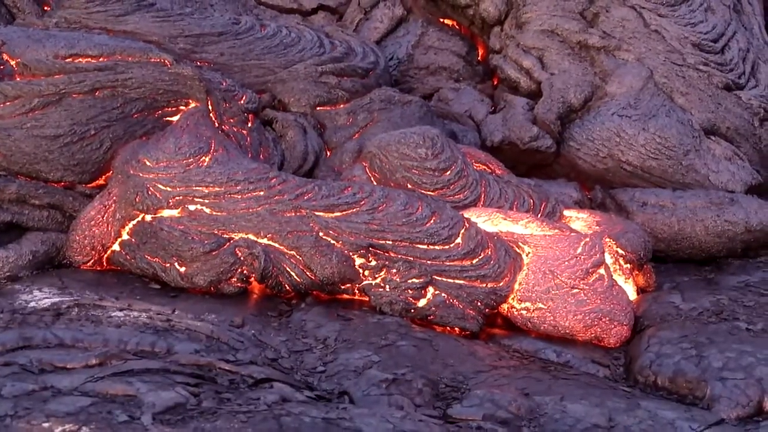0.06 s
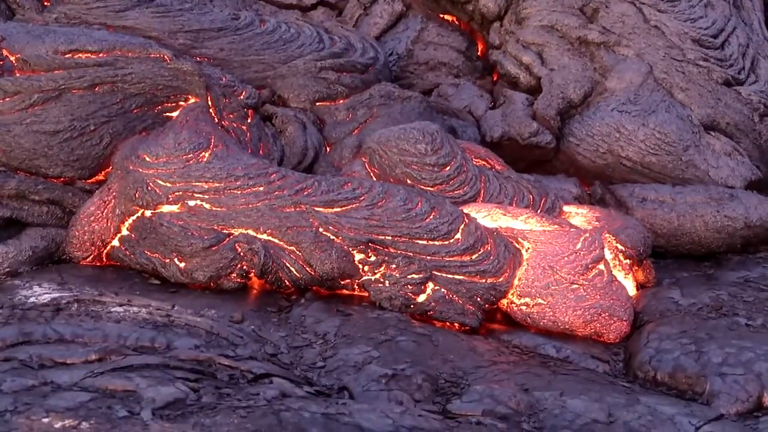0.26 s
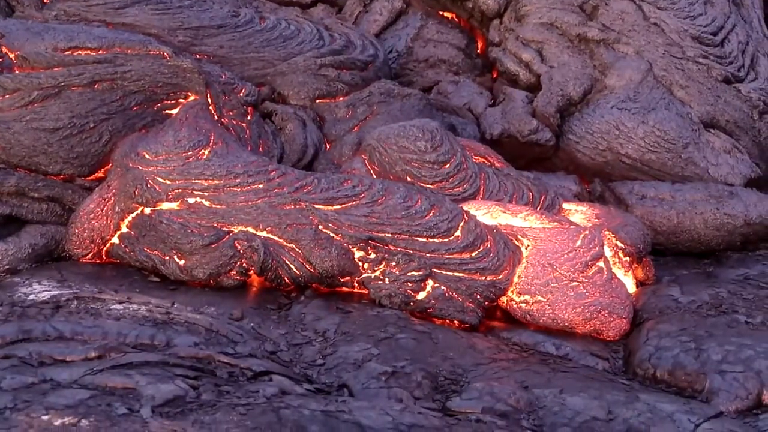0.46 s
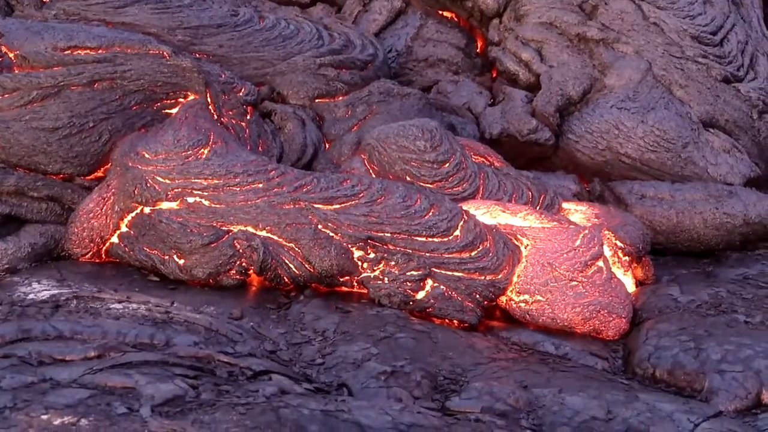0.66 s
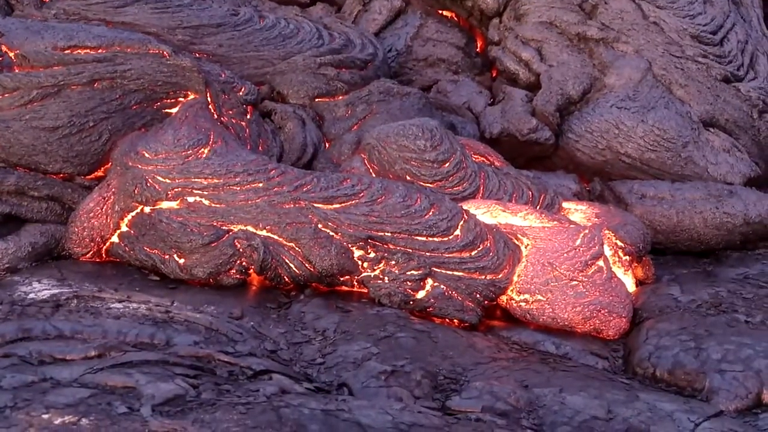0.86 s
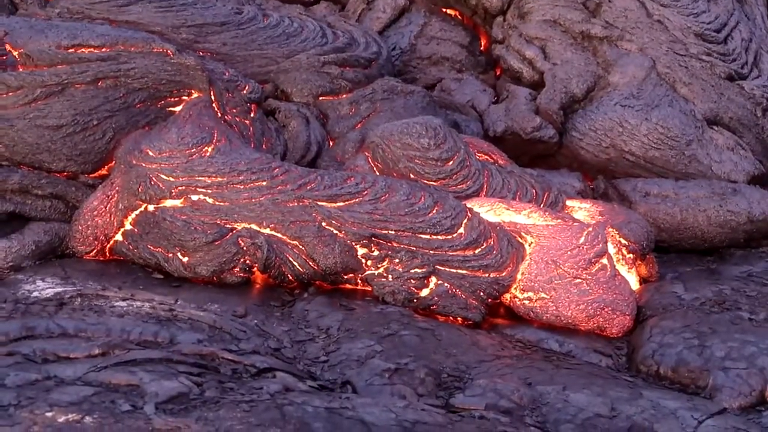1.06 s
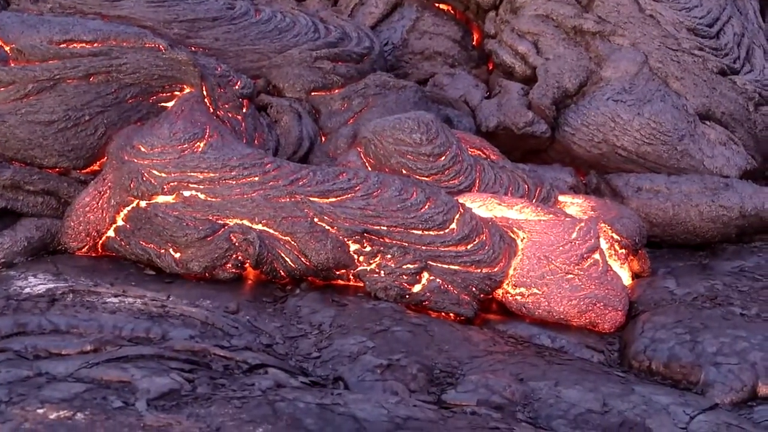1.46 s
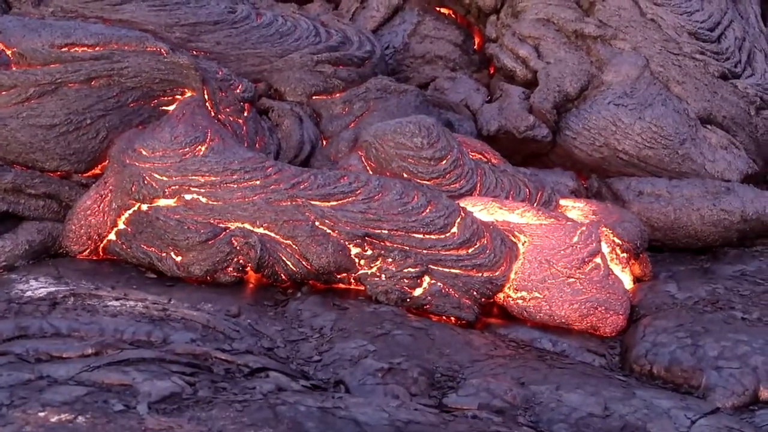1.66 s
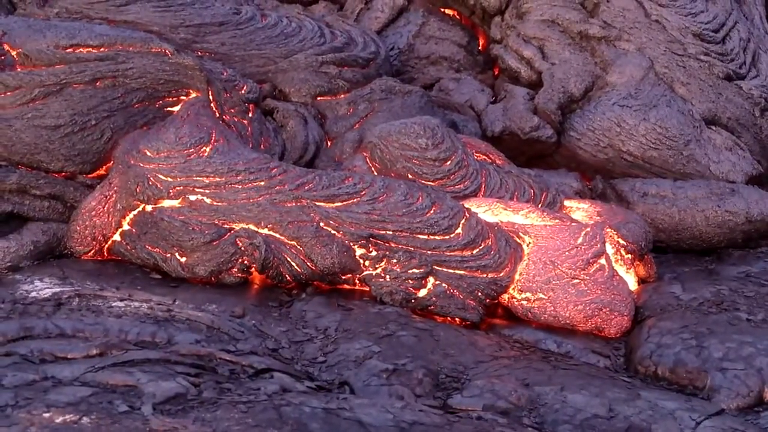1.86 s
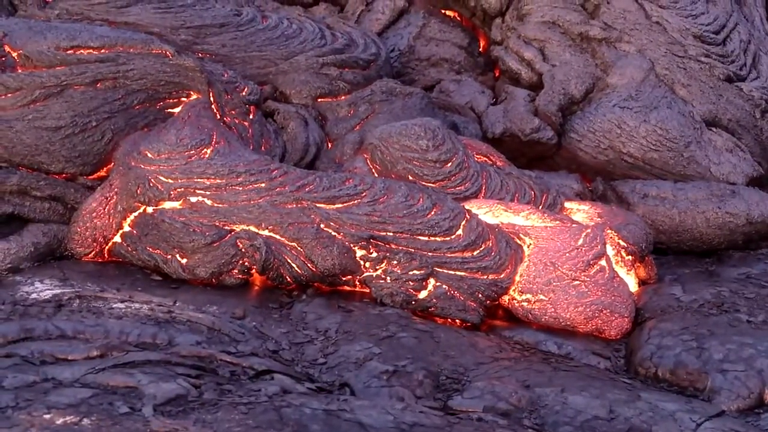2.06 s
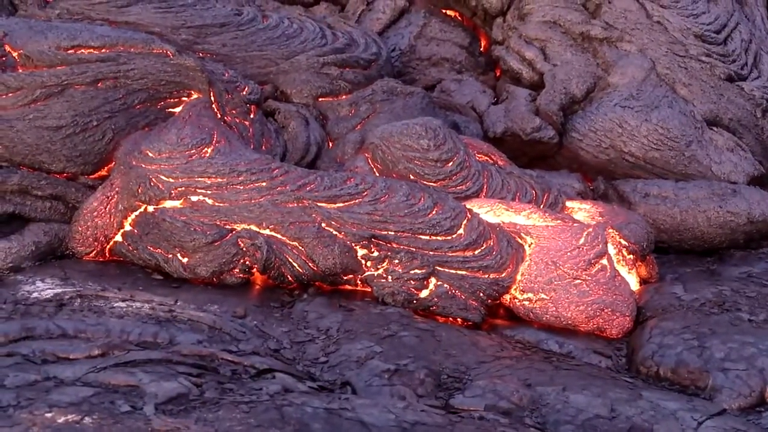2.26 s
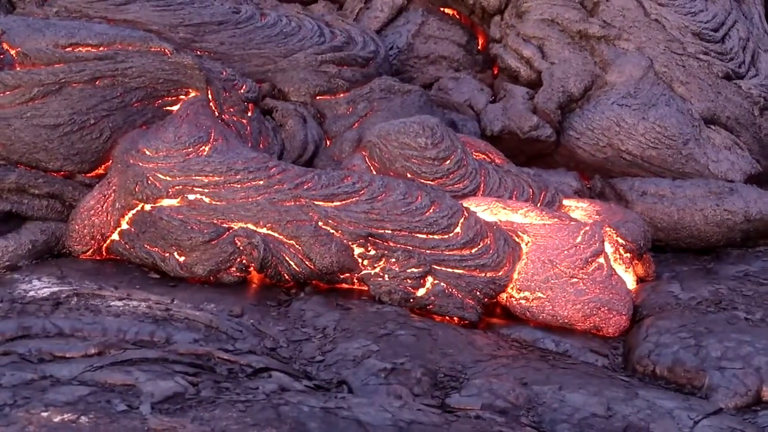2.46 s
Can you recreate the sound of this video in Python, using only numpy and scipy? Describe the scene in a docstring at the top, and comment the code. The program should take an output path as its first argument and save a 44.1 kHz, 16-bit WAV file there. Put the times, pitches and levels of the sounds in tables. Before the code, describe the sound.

Cooling lava crust gives one sharp, dry crack, followed by a few short, dull crunches and scattered small ticks. Outdoors, a faint hiss and fine crackle continue while wind gusts rumble and thump on the microphone.

```python
"""A lava flow cools in the open. From the start there is a faint hiss and a fine crackle of tiny snaps,
while gusts rumble on the microphone, more on the right. At 0.4 s the crust breaks with one sharp crack.
From about 0.6 to 0.9 s come short, dull, gritty crunches, probably the camera being handled, and the
microphone's housing rings thin and high. Small ticks of the crust come and go from then on. Around 2 s
the wind swells again, and its strongest eddies (small swirls of air) thump."""
import sys
import numpy as np
from scipy import signal
from scipy.fft import rfft, irfft
from scipy.io import wavfile
from scipy.ndimage import uniform_filter1d

SR = 44100
rng = np.random.default_rng(int(sys.argv[2]) if len(sys.argv) > 2 else 0)


def output_pcm(signal):
    """Save a mono or channel-first signal as 16-bit PCM at the path in sys.argv[1].

    Samples are clipped to [-1, 1] before scaling.
    """
    pcm = np.clip(np.atleast_2d(signal).T, -1, 1) * 32767
    wavfile.write(sys.argv[1], SR, np.round(pcm).astype(np.int16))


N = 110250  # 2.5 s

# the crack and its echo off the ground (time [s], level [dB])
CRACK_AND_ECHO = [(0.4005, -9), (.4106, -32)]
# the notes the slab rings with (pitch [Hz], level [dB], time to fade by 60 dB [s])
SLAB_NOTES = [(966, -6.5, 0.011), (1383, -12.5, 0.025), (1930, -4.5, 0.011), (2300, -8, 0.021),
              (2520, -5, 0.0052), (3110, -14, .021), (4700, -29.5, 0.045), (5060, -31, 0.049),
              (6060, -35, .025), (7110, -28, .015), (8273, -34.5, 0.015), (9680, -21, 0.015),
              (13400, -25, .011)]
# tone of the breaking noise (frequency [Hz], level [dB])
BREAK_TONE = [(200, 6), (850, 4), (2300, -9), (3100, -4), (3700, -11), (5000, -9.5), (6500, -13),
              (8500, -6.5), (11800, -6), (13300, -12), (15500, -33)]
# small ticks of the crust (time [s], level [dB], pitch [Hz], fade time [s])
CRUST_TICKS = [(0.6841, -27, 1180, 0.0011), (0.7021, -26, 2080, 0.0024), (0.8251, -33, 2070, 0.003),
               (0.8678, -33, 2320, 0.0027), (1.4094, -32.5, 1470, 0.0028), (1.4415, -37, 1320, 0.0041),
               (1.5505, -27, 2470, 0.0017), (1.774, -30, 1550, 0.0011), (1.7979, -30.5, 3030, 0.0015),
               (1.8123, -32, 2380, .002), (1.827, -35, 2430, 0.0023), (1.8338, -23.5, 1360, 0.0022),
               (1.85, -24, 1380, 0.0017), (1.879, -33, 1450, 0.0022), (2.0275, -34.5, 2810, 0.0019),
               (2.1055, -33.5, 1440, 0.0023), (2.2155, -33.5, 2390, 0.0018), (2.3157, -24, 1900, 0.00075),
               (2.3326, -26, 2420, 0.0013), (2.353, -20.5, 1890, 0.0013), (2.369, -31, 1740, 0.0056),
               (2.38, -29, 1780, 0.0041), (2.3963, -34, 1810, 0.0034), (2.413, -34, 2770, 0.0028),
               (2.459, -23.5, 1740, 0.0019)]
# tone of the puff of noise in a tick (frequency [Hz], level [dB])
PUFF_TONE = [(150, -31), (500, -2.5), (1000, -4), (3400, -3.5), (4600, -20.5), (8000, -18), (13000, -27),
             (15500, -42)]
# short, dull crunches (time [s], level [dB])
CRUNCHES = [(0.642, -34.5), (0.669, -31), (.683, -29), (0.7005, -22), (0.721, -23.5), (0.822, -33),
            (0.845, -39), (0.861, -34)]
# tone of a crunch (frequency [Hz], level [dB])
CRUNCH_TONE = [(100, 1), (300, 2), (550, 2.5), (800, -12.5), (1500, -21), (2400, -20), (4000, -30.5),
               (6000, -34), (7500, -30), (9000, -27), (11000, -17), (15000, -47)]
# swarms of fine crackle (time [s], level [dB])
CRACKLE_LEVEL = [(0, -59.5), (.6, -59), (.69, -51.5), (.76, -48.5), (.8, -60), (.85, -48.5), (.89, -54.5),
                 (1.3, -56), (1.42, -52), (1.74, -59.5), (1.85, -52), (1.92, -58), (2.28, -58), (2.37, -51),
                 (2.5, -55)]
# tone of its tiny snaps (frequency [Hz], level [dB])
SNAP_TONE = [(150, 0), (900, 0), (2800, -2.5), (3500, -11), (5000, -12), (9000, -20.5), (15000, -46)]
# bright grit around the crunches (time [s], level [dB])
GRIT_LEVEL = [(.6, -67), (.65, -64), (.71, -57), (.77, -80), (.8, -73), (.845, -51), (.9, -87)]
# tone of its grains (frequency [Hz], level [dB])
GRAIN_TONE = [(1000, 5), (3500, 4), (6000, -2), (7500, 7), (10000, -8), (13000, -17), (15500, -23)]

# gusts at the microphone (time [s], level [dB])
GUST_LEVEL = [(0, -67), (.07, -36), (.17, -42), (.225, -38.5), (.335, -59), (.385, -24.5), (.48, -37.5),
              (.53, -26), (.58, -57), (.65, -37.5), (.72, -23), (.81, -31), (.88, -44), (.98, -58),
              (1.015, -38.5), (1.12, -41.5), (1.2, -56.5), (1.33, -51.5), (1.4, -38.5), (1.52, -64.5),
              (1.61, -37), (1.68, -66), (1.8, -43), (1.86, -25.5), (1.935, -25.5), (1.97, -33), (2.0, -31),
              (2.035, -31), (2.05, -34.5), (2.075, -16.5), (2.105, -34.5), (2.13, -29), (2.155, -52),
              (2.19, -37.5), (2.245, -30), (2.285, -53), (2.5, -76)]
# tone of their low rumble (frequency [Hz], level [dB])
GUST_RUMBLE_TONE = [(20, -25), (45, -9), (70, 2), (95, 8.5), (135, 1), (190, -7.5), (280, -15.5),
                    (500, -66), (900, -90)]
# tone of their higher flutter (frequency [Hz], level [dB])
GUST_FLUTTER_TONE = [(60, -47), (130, -3), (190, 1.5), (300, -7), (430, -5.5), (540, -24), (800, -43),
                     (1500, -106)]
# the wind's deepest rumble (time [s], level [dB])
DEEP_LEVEL = [(0, -51), (.07, -42), (.23, -42.5), (.32, -42), (.38, -37.5), (.53, -42.5), (.62, -44.5),
              (.95, -41.5), (1.02, -37.5), (1.22, -54), (1.42, -48.5), (1.75, -58.5), (1.87, -36),
              (2.06, -40), (2.22, -36.5), (2.32, -67), (2.39, -51), (2.5, -69)]
# tone of that deepest rumble (frequency [Hz], level [dB])
DEEP_RUMBLE_TONE = [(5, -33), (20, -5.5), (40, -6), (62, 1.5), (90, -4), (160, -23), (400, -98)]
# eddies that suck at the microphone (time [s], peak level [dB], pitch [Hz], half-width [cycles])
EDDY_THUMPS = [(0.2286, -24.5, 117, .5), (0.369, -22.5, 194, 0.58), (.386, -19, 157, 0.66),
               (.438, -15.5, 144, 0.61), (0.4937, -25, 214, 0.47), (0.525, -13, 200, 0.36),
               (0.704, -18, 314, 0.55), (0.7207, -9.5, 302, 0.56), (0.744, -22, 198, 0.81),
               (0.771, -19.5, 211, 0.85), (1.127, -25.5, 184, 0.75), (1.8619, -17, 207, 0.56),
               (1.882, -17.5, 127, 0.67), (1.9047, -15, 170, 0.54), (1.9275, -16, 145, 0.56),
               (1.9527, -15.5, 251, 0.88), (1.9839, -23, 182, 0.85), (2.0633, -13.5, 134, 0.34),
               (2.0763, -14.5, 223, 0.64), (2.087, -14, 180, 1), (2.1346, -22.5, 141, 0.34),
               (2.176, -22, 175, 0.58), (2.2454, -20, 127, 0.37)]
# how the wind leans to the right (frequency [Hz], left minus right [dB])
WIND_BALANCE = [(30, -1.5), (80, -0.5), (150, -3), (260, -7.5), (420, -12), (800, -22)]
# thin ring of the microphone's housing (time [s], level [dB])
RING_LEVEL = [(.6, -90), (.63, -79), (.648, -57), (.69, -56), (.705, -47), (.73, -48), (.77, -56),
              (.795, -71), (.815, -66), (.83, -55), (.85, -52), (.87, -64), (.9, -90)]
# tone of the steady hiss (frequency [Hz], level [dB])
HISS_TONE = [(150, -5), (400, 7), (520, -2.5), (750, 5), (1100, -6), (1400, 2), (1720, -7), (1980, -2.5),
             (2230, -8), (2450, 2), (2750, -8), (3050, -4), (4000, -7.5), (5000, -12.5), (7000, -16.5),
             (10000, -19), (13000, -19.5), (14500, -26), (15500, -47)]
# how alike the hiss is on the left and right (frequency [Hz], likeness [-1 to 1])
HISS_LIKENESS = [(300, 0.87), (700, 0.61), (1400, 0.2), (3000, 0.65), (4500, 0.051), (6500, 0.096),
                 (10000, 0.32), (14000, -0.67)]


def crack():
    """The crust breaks: a burst of noise, a short ring of the slab, and a brief, faint, noisy tail."""
    hold_s, fall_s, tail_s = .0025, .0007, .009
    burst_db, tail_db = -15, -23
    out, t = np.zeros(N), np.arange(4096) / SR
    rise = np.minimum(t / .0003, 1)
    burst = amp(burst_db) * np.exp(-np.maximum(t - hold_s, 0) / fall_s)
    slab = sum((-1) ** k * amp(db - 60 * t / fade_s) * np.sin(2 * np.pi * hz * t)
               for k, (hz, db, fade_s) in enumerate(SLAB_NOTES))
    for s, db in CRACK_AND_ECHO:
        add(out, s, amp(db) * rise * (burst * noise(BREAK_TONE, len(t)) + slab))
    s, db = CRACK_AND_ECHO[0]
    tail = rise * np.exp(-t / tail_s) * noise(BREAK_TONE, len(t))
    add(out, s, amp(db + tail_db) * tail)
    return out


def ticks(rise_s=.00037, note_db=-5, puff_db=-9.5):
    """Each tick of the crust is a puff of noise and a note that dies almost at once."""
    out, t = np.zeros(N), np.arange(1024) / SR
    for s, db, hz, fall_s in CRUST_TICKS:
        note = amp(note_db) * np.sin(2 * np.pi * hz * t)
        puff = amp(puff_db) * noise(PUFF_TONE, len(t))
        shape = np.minimum(t / rise_s, 1) * np.exp(-t / fall_s)
        add(out, s, amp(db) * shape * (note + puff))
    return out


def crunches(rise_s=.002, fall_s=.0053):
    """Short, dull, gritty crunches, probably the camera being handled."""
    out, t = np.zeros(N), np.arange(2048) / SR
    shape = np.minimum(t / rise_s, 1) * np.exp(-t / fall_s)
    for s, db in CRUNCHES:
        add(out, s, amp(db + 1) * shape * noise(CRUNCH_TONE, len(t)))
    return out


def crackle():
    """Tiny snaps come in swarms as the lava's skin stretches; brighter grit goes with the crunches."""
    skin = level(CRACKLE_LEVEL) * snaps(SNAP_TONE, per_s=760)
    grit = level(GRIT_LEVEL) * snaps(GRAIN_TONE, per_s=4700)
    return skin + grit


def wind(rumble_db=-.5, flutter_db=-35.5, strong_gust_db=-25):
    """Gusts push and eddies suck at both sides of the microphone, harder on the right."""
    gust, t = level(GUST_LEVEL), np.arange(N) / SR
    rumble = amp(rumble_db) * gust * turbulence(GUST_RUMBLE_TONE)
    deep = level(DEEP_LEVEL) * turbulence(DEEP_RUMBLE_TONE)
    growth = (gust / amp(strong_gust_db)) ** 1.7  # flutter grows faster than rumble as a gust builds
    flutter = amp(flutter_db) * growth * turbulence(GUST_FLUTTER_TONE)
    pressure = rumble + deep + flutter
    for s, db, hz, cycles in EDDY_THUMPS:
        turns = hz * (t - s)
        pressure -= amp(db) * np.cos(2 * np.pi * turns) * np.exp(-(turns / cycles) ** 2)
    left_over_right = amp(read(WIND_BALANCE, np.fft.rfftfreq(N, 1 / SR)))
    right = 2 * rfft(pressure) / (1 + left_over_right)
    return irfft(np.array([left_over_right * right, right]), N)


def turbulence(tone, smooth_s=.031):
    """Churning air: low noise held at an even strength, ready to be shaped into gusts."""
    x, size = noise(tone, N), int(smooth_s * SR)
    power = uniform_filter1d(uniform_filter1d(x ** 2, size), size)
    return x / np.sqrt(abs(power) + 1e-6)


def housing_ring(pitch_hz=6940, half_width_hz=50):
    """The microphone's housing sings one thin, wavering note, made from a narrow band of noise."""
    hz = np.fft.rfftfreq(N, 1 / SR)
    band = 1 / (1 + ((hz - pitch_hz) / half_width_hz) ** 2)
    note = evened(irfft(rfft(rng.standard_normal(N)) * band, N))
    note /= np.sqrt(abs(uniform_filter1d(note ** 2, size=400)) + 1e-3)  # hold its strength even
    return level(RING_LEVEL) * note * np.array([[-1], [1]])  # left pulls while right pushes


def hiss(level_db=-54, low_cut_hz=150, patch_db=1.9):
    """Wide, airy noise in which faint patches of the tone come and go."""
    frames, hz = N // 128 + 5, np.fft.rfftfreq(512, 1 / SR)  # built in short slices of time
    a, b, c, d, patches = rng.standard_normal((5, frames, len(hz)))
    patches = uniform_filter1d(patches, size=16, axis=0)  # smooth over time
    patches = evened(uniform_filter1d(patches, size=10, axis=1))  # and over frequency
    likeness = read(HISS_LIKENESS, hz)
    left = a + 1j * b
    right = likeness * left + np.sqrt(1 - likeness ** 2) * (c + 1j * d)
    tone = amp(read(HISS_TONE, hz) + patch_db * patches) * hz / np.hypot(hz, low_cut_hz)
    slices = np.array([left, right]) * tone
    _, sound = signal.istft(slices.swapaxes(1, 2), nperseg=512, noverlap=384)
    return amp(level_db) * evened(sound[:, :N])


def amp(db):
    """Turns decibels into a number to multiply by."""
    return 10 ** (np.asarray(db) / 20)


def evened(x):
    """Scales a sound to an average strength (rms) of 1."""
    return x / np.sqrt(np.mean(x ** 2) + 1e-20)


def read(points, hz):
    """Looks up a table between its rows, with octaves evenly spaced."""
    f, value = np.transpose(points)
    return np.interp(np.log(hz + 1), np.log(f + 1), value)


def level(points):
    """Turns a table of levels over time into a volume for every sample."""
    return amp(np.interp(np.arange(N) / SR, *np.transpose(points)))


def colour(x, tone):
    """Turns each frequency up or down as a tone table says."""
    hz = np.fft.rfftfreq(len(x), 1 / SR)
    return irfft(rfft(x) * amp(read(tone, hz)), len(x))


def noise(tone, size):
    """Noise of strength 1 with the given tone."""
    return evened(colour(rng.standard_normal(size), tone))


def snaps(tone, per_s, spread_db=2.5):
    """Random clicks of uneven size, with an overall strength of 1."""
    size = amp(spread_db * np.minimum(rng.exponential(1, N), 4)) * rng.choice([-1, 1], N)
    happens = rng.random(N) < per_s / SR
    return evened(colour(size * happens, tone))


def add(mix, s, sound):
    """Mixes a sound in, starting at s seconds."""
    part = mix[max(round(s * SR), 0):][:len(sound)]
    part += sound[:len(part)]


def from_right(x, lag_s=.000045, lean_db=.62):
    """A sound a little to the right reaches the left side slightly later and softer."""
    delay = np.exp(-2j * np.pi * np.fft.rfftfreq(N, 1 / SR) * lag_s)
    left = irfft(rfft(x) * delay, N)
    return np.array([left * amp(-lean_db), x * amp(lean_db)])


def scene():
    """Lava and crunches a little to the right, hiss all around, wind on the microphone."""
    short_sounds = crack() + ticks() + crunches() + crackle()
    return from_right(short_sounds) + hiss() + wind() + housing_ring()


def record(dry):
    """Cuts away the very highest treble, above 15700 Hz."""
    low_pass = signal.firwin(511, 15700, window=("kaiser", 9), fs=SR)
    return signal.oaconvolve(dry, low_pass[None], "same")


dry = scene()
out = record(dry)
output_pcm(out)
```